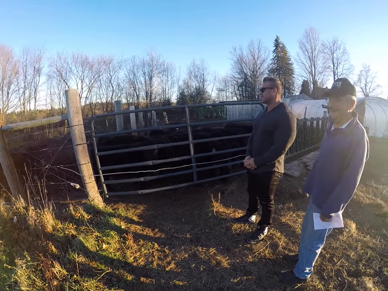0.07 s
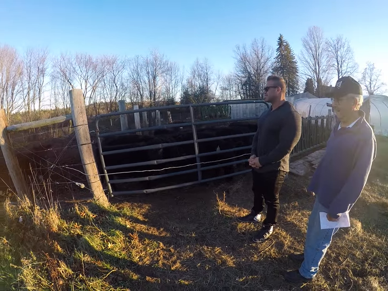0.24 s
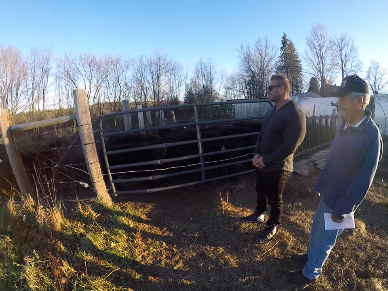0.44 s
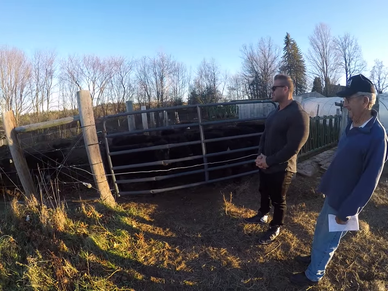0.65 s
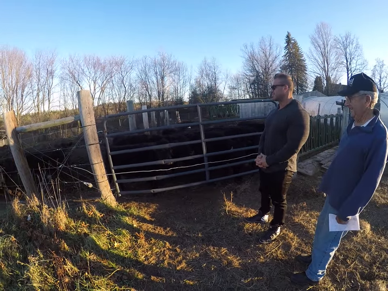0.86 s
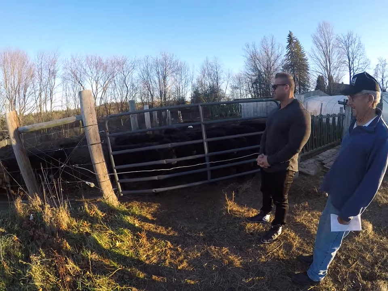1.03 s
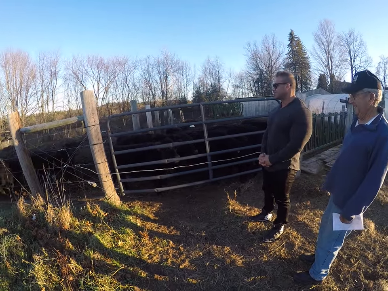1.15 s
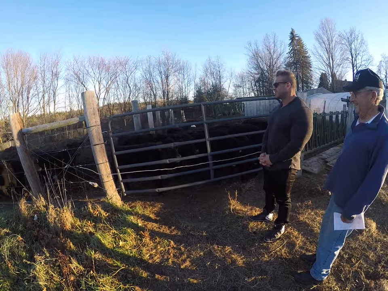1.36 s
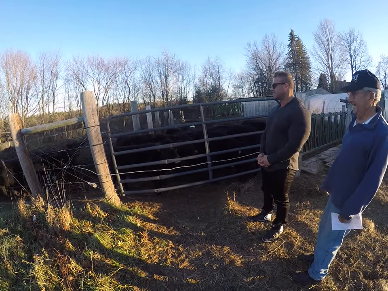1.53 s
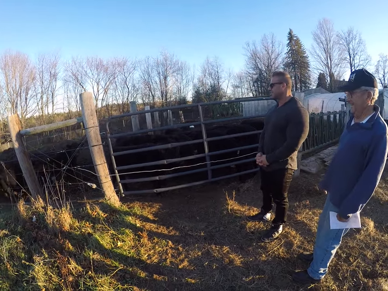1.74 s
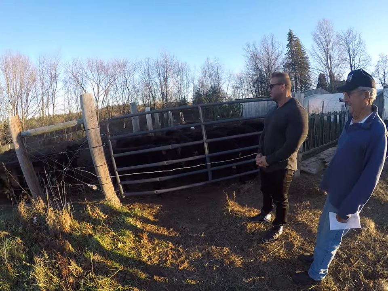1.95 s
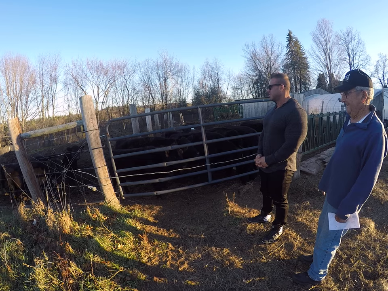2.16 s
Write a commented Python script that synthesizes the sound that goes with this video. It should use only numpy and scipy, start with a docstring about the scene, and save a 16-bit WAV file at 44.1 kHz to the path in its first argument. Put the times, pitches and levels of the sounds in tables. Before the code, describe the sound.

A cow moos once, rising in pitch and holding, over light wind.

```python
"""A cow moos once in an open farm pen. Air first whistles through its nose over a low hum; then the
vocal folds speed up, and the voice climbs more than an octave through the resonances of throat and
mouth, holds a clear loud note and drops off in a short rasp. Ground and pen return weak echoes.
Dry straw ticks faintly, a steady rush lies far off, and a light wind rumbles on the microphone."""
import sys
import numpy as np
from scipy import signal
from scipy.fft import rfft, irfft, next_fast_len
from scipy.io import wavfile

SR = 44100
rng = np.random.default_rng(int(sys.argv[2]) if len(sys.argv) > 2 else 0)


def materialize(psi):
    """Save the field psi as 16-bit PCM at rate SR to the path in sys.argv[1].

    A 1-D psi becomes a single channel; in a 2-D psi each row is a channel.
    """
    bounded = np.clip(np.atleast_2d(psi).T, -1, 1)
    quanta = np.round(bounded * 32767).astype(np.int16)
    wavfile.write(sys.argv[1], SR, quanta)


N = 96755

# vocal fold rate: t/s, f/Hz
FOLD_RATE = [(0.33, 106.8), (0.362, 108.5), (0.396, 108.2), (0.45, 112.9), (0.488, 120.0), (0.528, 127.1),
             (0.564, 128.9), (0.68, 161.1), (0.788, 193.9), (0.902, 216.1), (0.966, 224.6), (1.09, 236),
             (1.138, 242.1), (1.418, 254.7), (1.474, 250.2), (1.482, 247.9), (1.508, 226.8), (1.54, 192)]
# course of the call: t/s, fundamental level/dB, overtone level/dB, treble lift/dB, roughness (0 = clear)
MOO_COURSE = [(.28, -62, -59, -12, 0.1), (.42, -36.5, -49, -5, .3), (.56, -38, -45, -2, 0.21),
              (.64, -39, -45.5, 4, 0.7), (.69, -47, -40, 5, 0.56), (.80, -31, -35, 3, 0.33),
              (.90, -26.5, -34.5, 5.5, 0.27), (1.06, -22, -34, 6.5, 0.1), (1.14, -18.5, -31.5, -0.5, .12),
              (1.30, -19.5, -29, -5, 0.13), (1.42, -18.5, -30.5, -3.5, 0.2), (1.475, -20.5, -29.5, -2, .25),
              (1.515, -25, -30, -2.5, 0.65), (1.533, -32.5, -37, -2, 0.4), (1.552, -58, -48, 5, 1.1)]
# steady colour of the overtones: f/Hz, level/dB
VOICE_COLOUR = [(200, -3), (480, -3.5), (820, -7), (950, -14), (1100, -12), (1500, -13), (2000, -18.5),
                (2300, -25), (3000, -32), (3700, -37), (4300, -43), (4650, -47), (5000, -41), (6500, -51),
                (8300, -52), (9400, -58), (10800, -54), (15000, -63)]
def moo():
    """The cow's vocal folds, out in front: a clean fundamental under overtones fringed by puffs of air."""
    treble_hz, jitter, shimmer, phase_spread_rad = 2300, .016, .38, 1.5
    rasp_db, rasp_db_per_octave = -3, 2.5
    pitch, = in_time(FOLD_RATE)
    fundamental_db, overtone_db, treble_db, roughness = in_time(MOO_COURSE)
    t = np.arange(N) / SR
    phase = 2 * np.pi * np.cumsum(pitch * (1 + jitter * roughness * drift(63))) / SR
    voiced = (t > MOO_COURSE[0][0]) & (t < MOO_COURSE[-1][0])
    puffs = (roughness * (1 + np.cos(phase)))[voiced]
    overtones = np.zeros(N)
    for k in range(2, 58):
        hz = k * pitch[voiced]
        angle = k * phase[voiced] + phase_spread_rad * rng.standard_normal()
        rasp = puffs * from_db(rasp_db + rasp_db_per_octave * np.log2(hz / treble_hz))
        air = drift(140)[voiced] * np.cos(angle) + drift(210)[voiced] * np.sin(angle)
        lift_db = throat_db(hz, t[voiced]) + treble_db[voiced] / (1 + (treble_hz / hz) ** 4)
        flutter_db = (.33 + .66 * np.log2(k / 2)) * drift(6.1)[voiced]   # higher overtones waver more
        overtones[voiced] += (np.cos(angle) + rasp * air) * from_db(lift_db + flutter_db)
    overtones *= from_db(overtone_db) * (1 + shimmer * roughness * drift(150))
    fundamental = voiced * np.cos(phase) * from_db(fundamental_db)
    return np.sqrt(2) * (shape(overtones, at_hz(VOICE_COLOUR, bins())) + fundamental)


# six resonances: width/Hz, then rows of t/s, centre f/Hz, lift/dB
THROAT_RESONANCES = [ (70, [(.8, 740, 1.5), (.88, 840, 9.5), (.96, 726, 7), (1.2, 730, 9.5),
                     (1.33, 750, 0.5), (1.51, 714, 8.5)]), (90, [(.7, 1220, 5), (.8, 1233, 15.5),
                     (.88, 1090, 10.5), (1.02, 1143, 23.5), (1.12, 1226, 10.5), (1.3, 1182, 17.5),
                     (1.42, 1055, 11.5), (1.51, 1100, 9.5)]), (110, [(.62, 1630, 0), (.69, 1558, 8),
                     (.8, 1460, 6.5), (.88, 1955, 7.5), (.96, 1760, 12.5), (1.12, 1950, 19),
                     (1.38, 2100, 8), (1.46, 1960, 14), (1.51, 1740, 12.5)]), (120, [(.68, 2540, 12.5),
                     (.8, 2180, 10), (.9, 2209, 14), (1.03, 2154, 15), (1.11, 2726, 16), (1.25, 2700, 11),
                     (1.45, 2790, 16), (1.51, 2720, 12)]), (170, [(.7, 2840, 11), (.8, 3054, 15.5),
                     (.88, 3070, 5), (.96, 3611, 13.5), (1.04, 3520, 7), (1.2, 3330, 22),
                     (1.32, 3460, 15.5), (1.46, 3500, 20.5), (1.53, 3231, 16.5)]), (190, [(.7, 5150, 3),
                     (.88, 5400, 7.5), (.97, 5760, -3), (1.2, 5350, 19.5), (1.38, 5570, 19),
                     (1.5, 5430, 12)])]
def throat_db(hz, t):
    """Resonances of throat and mouth move with the jaw and lift each overtone that passes through."""
    total_db = 0
    for width_hz, course in THROAT_RESONANCES:
        times, centres, lifts = np.transpose(course)
        offset_hz = hz - np.interp(t, times, centres)
        total_db += np.interp(t, times, lifts) * np.exp(-.5 * (offset_hz / width_hz) ** 2)
    return total_db


# nasal tones: f/Hz, level/dB, peak t/s, spread around the peak/s
NOSE_TONES = [(2822, -2, 0.56, 0.42), (3450, -9, 0.42, 0.17), (4090, -7.5, 0.29, 0.18),
              (4900, -10.5, 0.5, 0.13), (6400, -26, 0.39, 0.17)]
# their common glide: t/s, pitch ratio
NOSE_GLIDE = [(.17, 1.025), (.22, 1.005), (.36, .99), (.48, .945), (.58, .92), (.78, .92)]
# whistle and hiss together: t/s, level/dB
NOSE_LEVEL = [(.11, -90), (.16, -61), (.19, -53.5), (.36, -51), (.48, -54.5), (.58, -57.5), (.68, -51),
              (.78, -53), (.86, -100)]
def nose():
    """Pulsing air whistles in narrow nasal resonances that sink together as the voice sets in."""
    waver, hiss_db = .0088, -7.5
    glide, = in_time(NOSE_GLIDE)
    t = np.arange(N) / SR
    whistle = np.zeros(N)
    for hz, db, peak_s, spread_s in NOSE_TONES:
        phase = 2 * np.pi * np.cumsum(hz * glide * (1 + waver * drift(134))) / SR
        envelope = from_db(db + 2.2 * drift(30)) * np.exp(-.5 * ((t - peak_s) / spread_s) ** 2)
        whistle += np.sqrt(2) * envelope * np.sin(phase)
    hiss = noise(at_hz([(1000, -9), (3500, 11.5), (7000, -9), (15000, -20)], bins()))
    return swell(NOSE_LEVEL) * fold_puffs() * (whistle + from_db(hiss_db) * hiss)


# hiss at the mouth: t/s, level/dB
HISS_LEVEL = [(.58, -81), (.69, -64), (0.819, -84), (1.0, -71), (1.1, -58), (1.251, -63.5), (1.52, -62),
              (1.56, -90)]
# its colour: f/Hz, level/dB
HISS_COLOUR = [(1500, -14.5), (4000, 7.5), (7000, -0.5), (11000, -4.5), (15000, -11.5)]
# closing whistle: t/s, level/dB
SQUEAK_LEVEL = [(1.42, -72), (1.46, -47), (1.53, -45), (1.56, -66)]
def mouth_air():
    """A pulsing hiss leaves the open mouth, joined by a thin whistle as the throat closes."""
    squeak_hz, half_width_hz = 3204, 14
    hiss = swell(HISS_LEVEL) * fold_puffs() * noise(at_hz(HISS_COLOUR, bins()))
    squeak = noise(-20 * np.log10(1 + ((bins() - squeak_hz) / half_width_hz) ** 2))
    return hiss + swell(SQUEAK_LEVEL) * squeak


def fold_puffs(depth=.55):
    """The airflow swells once in every cycle of the folds."""
    pitch, = in_time(FOLD_RATE)
    return 1 + depth * np.cos(2 * np.pi * np.cumsum(pitch) / SR)


# reflections at the microphone: t/s after the direct sound, level/dB
PEN_ECHOES = [(.011, -17), (0.023, -26), (.041, -35)]
def pen(direct, tail_db=-16.5, tail_t60_s=.24):
    """The ground and the pen nearby add weak echoes and a short scattered tail in the open air."""
    t = np.arange(N) / SR
    echoes = sum(from_db(db) * np.interp(t - delay, t, direct, left=0) for delay, db in PEN_ECHOES)
    scatter = rng.standard_normal(N) * from_db(-60 * t / tail_t60_s)
    tail = signal.fftconvolve(direct, scatter / np.linalg.norm(scatter))[:N]
    return direct + echoes + from_db(tail_db) * tail


# ticks in the straw: t/s, level/dB
STRAW_TICKS = [(.097, -58), (.674, -55), (1.386, -55), (2.059, -53.5)]
def straw(decay_s=.0041):
    """Dry straw ticks, faint at the microphone, each a tiny burst of bright noise."""
    t = np.arange(N) / SR
    bursts = sum(from_db(db) * (t >= s) * np.exp(-np.abs(t - s) / decay_s) for s, db in STRAW_TICKS)
    return bursts * noise(at_hz([(1000, -11.5), (5000, 0), (14000, -18)], bins()))


# colour of the distant rush: f/Hz, level/dB
RUSH_COLOUR = [(100, -19), (190, -3.5), (270, -14), (400, -9), (600, -5), (800, 1), (1000, 1), (1250, -6),
               (1800, -16), (2500, -23.5), (3300, -30.5), (4000, -36), (7000, -45), (11000, -70),
               (15000, -65)]
def far_rush(level_db=-37, waver_db=.78):
    """A nearly steady rush arrives from far beyond the pen."""
    return from_db(level_db + waver_db * drift(4)) * noise(at_hz(RUSH_COLOUR, bins()))


# colour of the wind rumble: f/Hz, level/dB
WIND_COLOUR = [(12, -20), (28, -4.5), (48, -8), (70, -6), (110, -15.5), (170, -17.5), (260, -28.5),
               (600, -64.5)]
# its strength: t/s, level/dB
WIND_COURSE = [(0, -39.5), (.2, -33), (.33, -32.5), (.43, -31.5), (.55, -34.5), (1.2, -34), (1.7, -35.5),
               (2.19, -35.5)]
def microphone_wind(gust_db=.5):
    """Light wind rumbles right on the microphone, in small gusts."""
    level_db, = in_time(WIND_COURSE)
    return from_db(level_db + gust_db * drift(5.4)) * noise(at_hz(WIND_COLOUR, bins()))


def from_db(db):
    """Decibels to gain."""
    return 10 ** (np.asarray(db) / 20)


def rms_one(x):
    """Scale to unit rms."""
    return x / np.sqrt(np.mean(x ** 2) + 1e-20)


def in_time(rows):
    """Each column of a curve, sample by sample."""
    times, *columns = np.transpose(rows)
    return [np.interp(np.arange(N) / SR, times, column) for column in columns]


def swell(rows):
    """Gain along a level curve, silent outside it."""
    times, db = np.transpose(rows)
    return from_db(np.interp(np.arange(N) / SR, times, db, left=-200, right=-200))


def at_hz(points, hz):
    """Read a spectrum on a log-frequency axis."""
    f, db = np.transpose(points)
    return np.interp(np.log(hz + 1), np.log(f), db)


def bins():
    """Frequencies on which filters are drawn."""
    return np.arange(next_fast_len(N) + 1) * SR / (2 * next_fast_len(N))


def shape(x, db):
    """Causal (minimum-phase) filter with the given dB at each bin."""
    size = 2 * (len(db) - 1)
    cepstrum = irfft(np.log(from_db(db) + 1e-12))
    cepstrum[1:size // 2] *= 2
    cepstrum[size // 2 + 1:] = 0
    return irfft(rfft(x, size) * np.exp(rfft(cepstrum)))[:N]


def noise(db):
    """Steady noise of a given colour, rms 1."""
    white = rng.standard_normal(2 * (len(db) - 1))
    return rms_one(irfft(rfft(white) * from_db(db))[:N])


def drift(rate_hz):
    """Random wandering with spread 1, mostly slower than the given rate."""
    hop, settle = 40, 2000
    pole = np.exp(-2 * np.pi * hop * rate_hz / SR)
    white = rng.standard_normal(N // hop + settle + 2)
    slow = signal.lfilter([1], [1, -2 * pole, pole * pole], white)[settle:]
    return np.interp(np.arange(N) / hop, np.arange(len(slow)), rms_one(slow))


def scene():
    """One microphone in the open: the cow in its pen, with straw, distant rush and wind behind it."""
    cow = moo() + nose() + mouth_air()
    return (pen(cow) + straw() + far_rush() + microphone_wind())[None]


def record(dry, cutoff_hz=15000):
    """The top of the microphone signal is cut steeply."""
    lowpass = signal.ellip(10, .05, 50, cutoff_hz, fs=SR, output="sos")
    return signal.sosfiltfilt(lowpass, dry, padtype="even", padlen=2000)


dry = scene()
out = record(dry)
materialize(out)
```